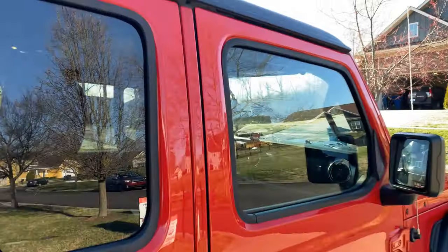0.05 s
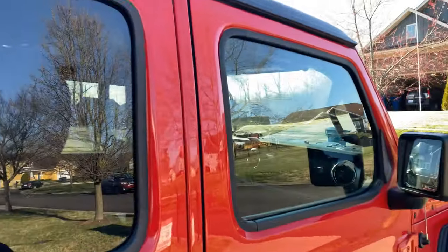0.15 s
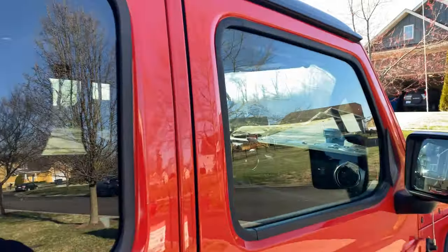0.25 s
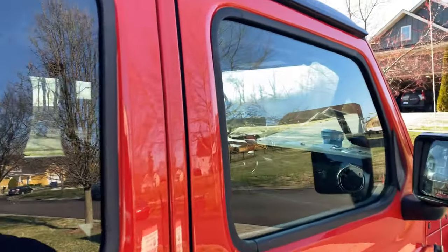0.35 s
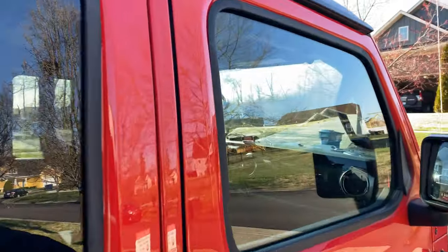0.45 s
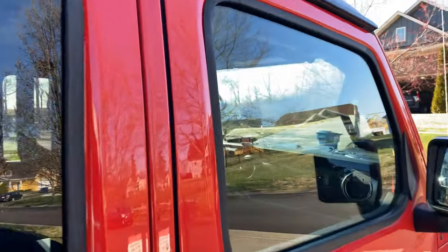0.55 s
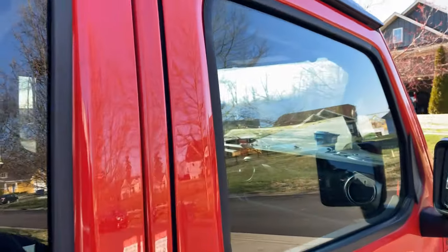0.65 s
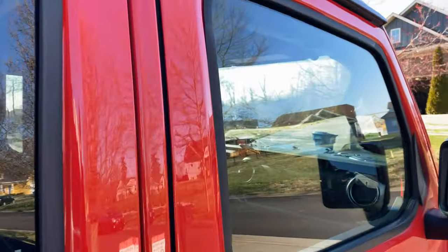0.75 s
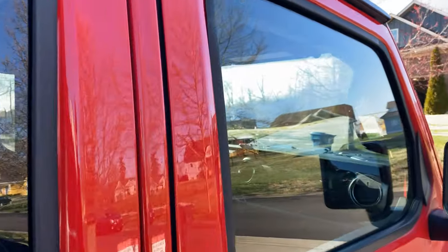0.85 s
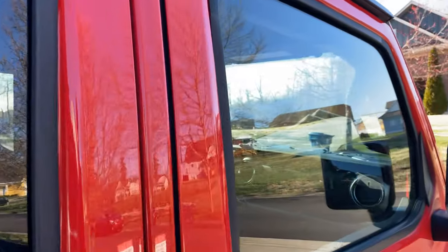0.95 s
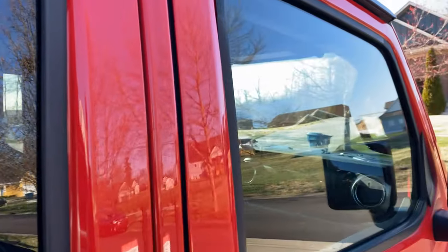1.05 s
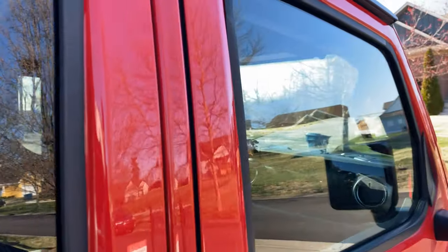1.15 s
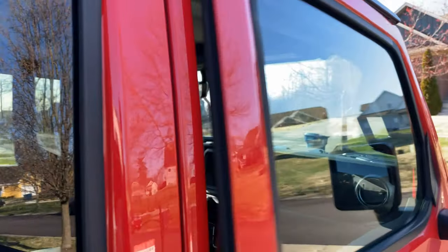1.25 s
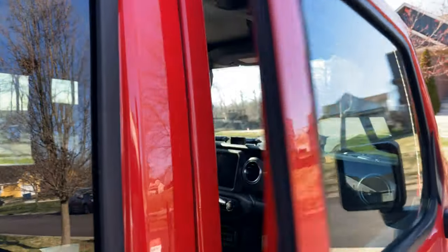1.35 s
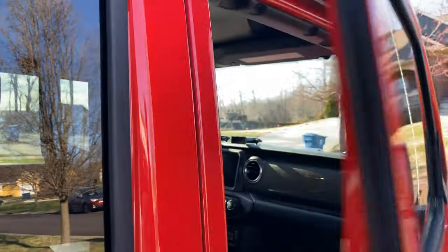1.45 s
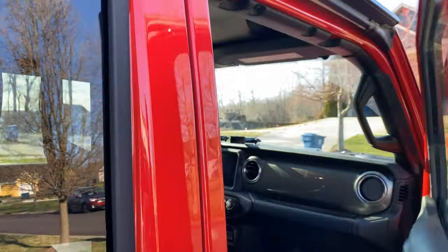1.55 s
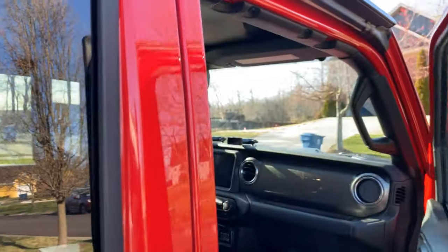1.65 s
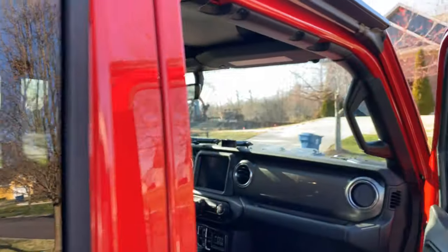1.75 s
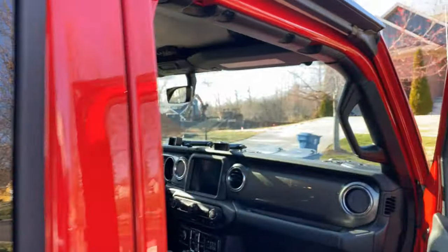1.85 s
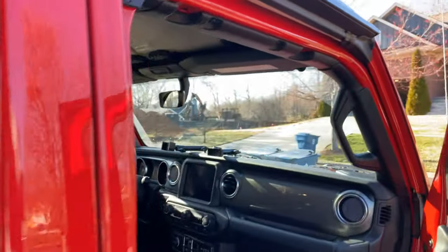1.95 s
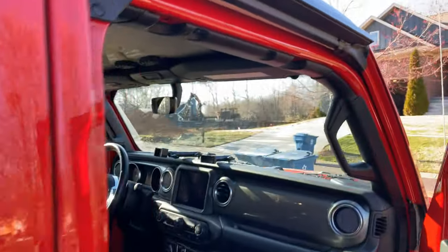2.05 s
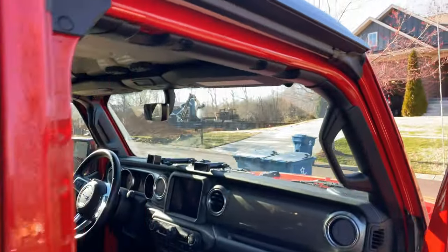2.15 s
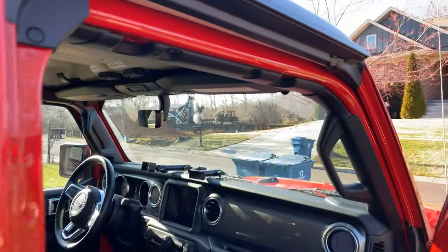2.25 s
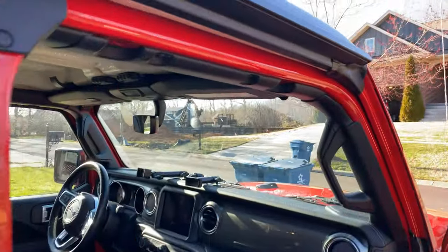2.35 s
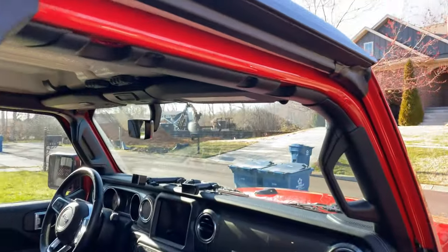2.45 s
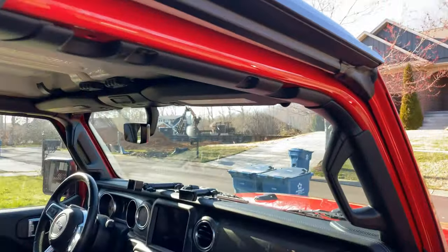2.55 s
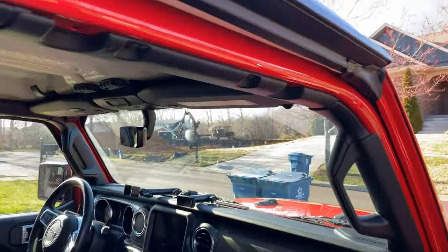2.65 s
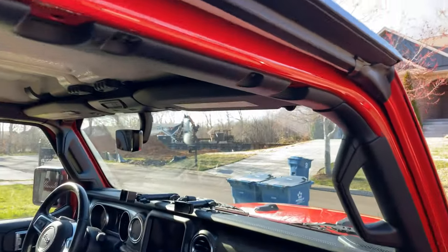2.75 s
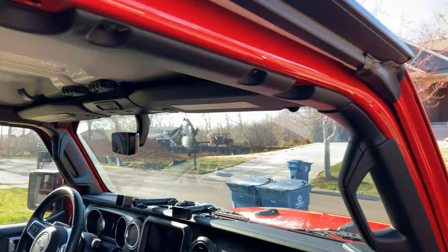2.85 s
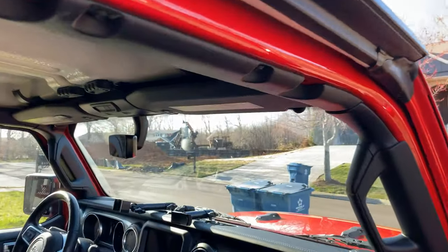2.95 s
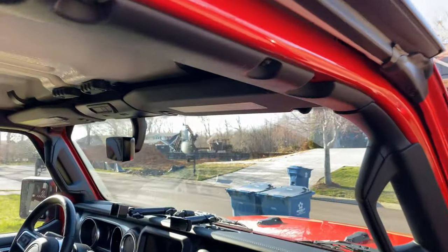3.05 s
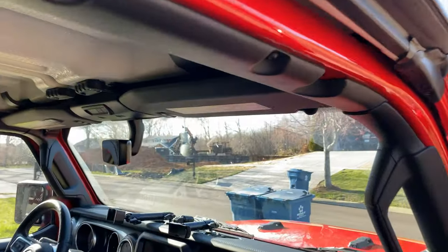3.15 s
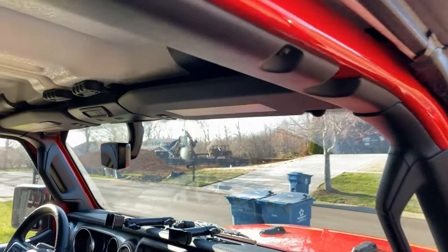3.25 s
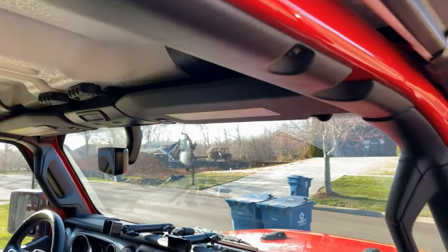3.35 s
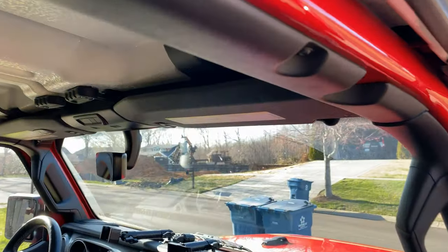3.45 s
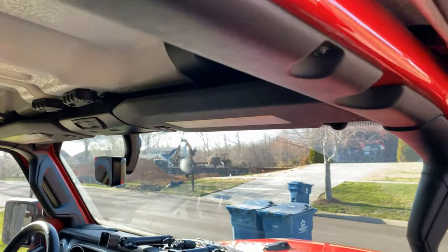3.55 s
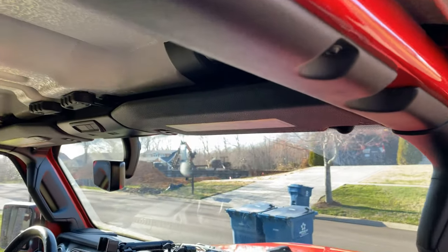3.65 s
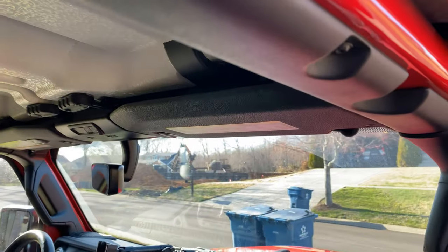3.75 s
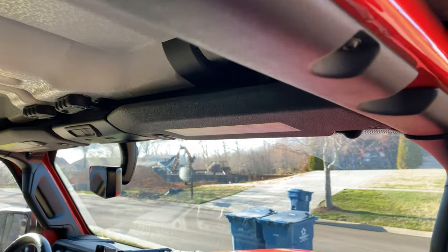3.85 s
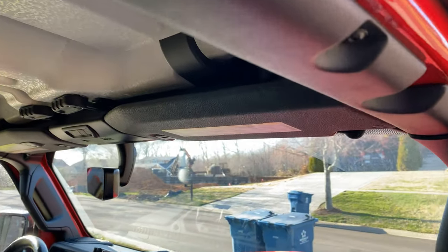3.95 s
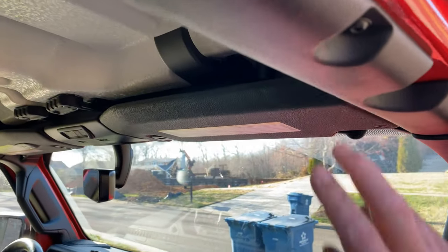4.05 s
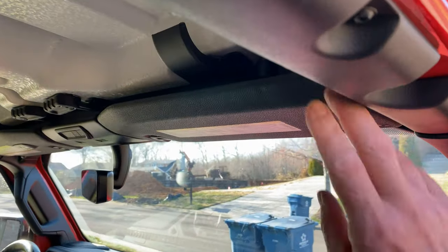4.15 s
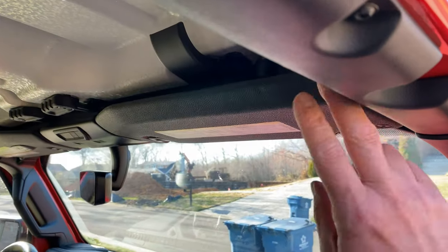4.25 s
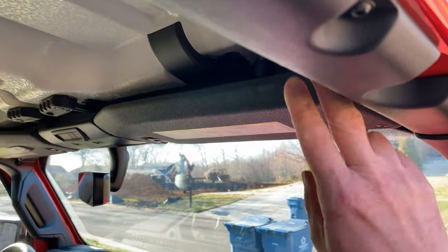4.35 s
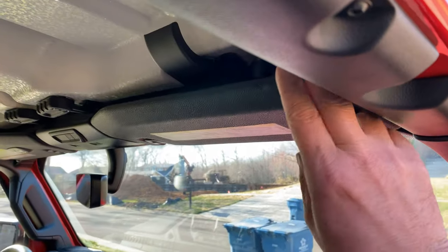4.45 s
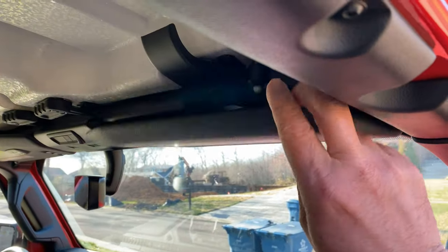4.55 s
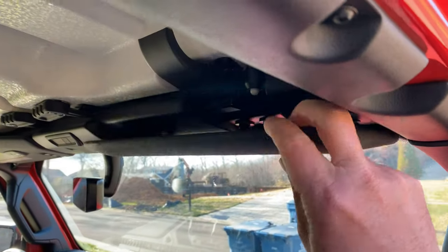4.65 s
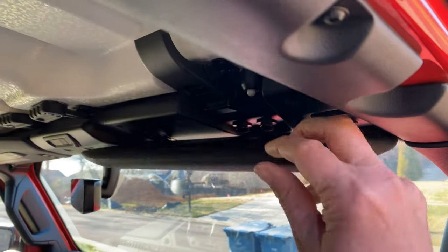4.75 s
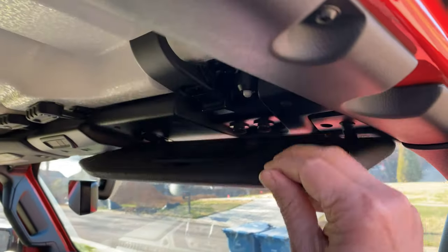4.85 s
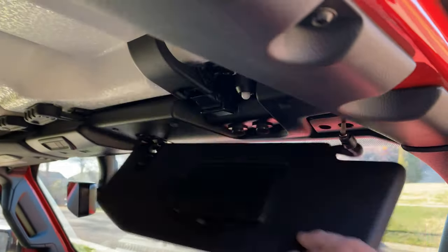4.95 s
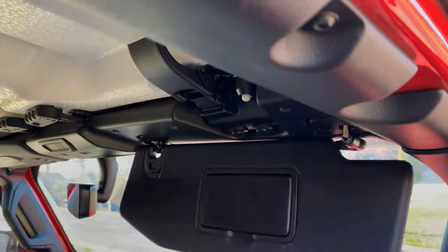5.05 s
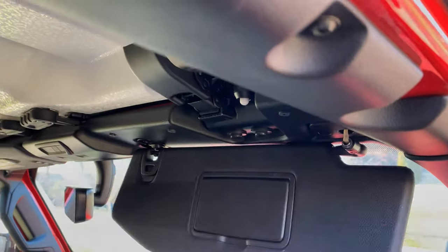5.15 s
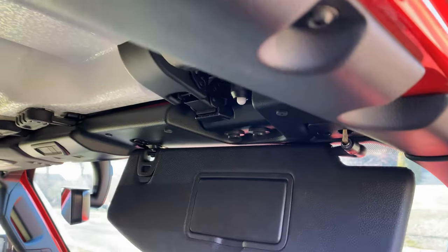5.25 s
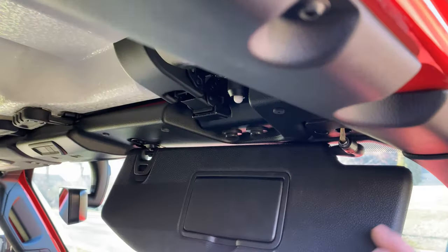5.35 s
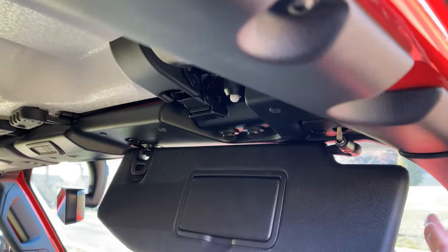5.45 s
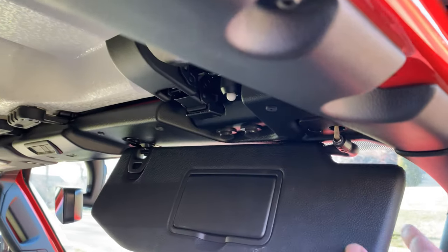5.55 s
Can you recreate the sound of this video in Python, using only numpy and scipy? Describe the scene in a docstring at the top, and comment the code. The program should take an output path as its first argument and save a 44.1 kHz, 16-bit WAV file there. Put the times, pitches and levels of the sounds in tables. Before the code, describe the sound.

Small birds chirp on a quiet street as a car door unlatches and swings to its stop, followed by a hard plastic visor snap.

```python
"""Small birds whistle in the trees, near and far, over a quiet street and the rumble of a hand-held microphone.
A car door is opened: the handle ticks, the latch lets go, the door booms, its check strap clunks and it meets
a rubber stop. Soft steps fall, clothes rustle, then a hand snaps the sun visor out of its seat, close by.
Birds are gliding sine notes with echoes; door and visor are struck sets of fading tones and noise;
booms and footsteps are low fading tones; cloth, rumble and street are coloured noise."""
import sys
import numpy as np
from scipy import signal
from scipy.fft import rfft, irfft, next_fast_len
from scipy.io import wavfile
from scipy.ndimage import uniform_filter1d, map_coordinates

SR = 44100
rng = np.random.default_rng(int(sys.argv[2]) if len(sys.argv) > 2 else 0)


def dump_mix(stems):
    """Bounce the given channels to the path in sys.argv[1] as a 16-bit WAV at rate SR."""
    frames = np.atleast_2d(stems).T  # one column per channel
    limited = np.clip(frames, -1, 1)  # hard clip at full scale
    pcm = np.round(limited * 32767).astype(np.int16)
    wavfile.write(sys.argv[1], SR, pcm)


N = 246959  # length in samples
TOP_HZ = 16500  # upper limit of the sound

# colour of the low rumble, used for handling and under booms and footsteps: pitch_hz, relative level_db per Hz
RUMBLE = [(20, -12.5), (40, 4), (60, 8.5), (90, 3), (150, -4.5), (265, -13.5), (600, -47), (1300, -73.5)]

# ways of touching: ring factor of the clicks (1 = full ring), treble edge in Hz, swell in s
# an edge above half the sample rate takes away almost no treble
TICK = (0.39, 42000, .0001)
CLUNK = (1, 5700, .0001)
SCRAPE = (1.6, 17000, 0.0011)
TAP = (0.81, 30000, .0001)
SNAP = (0.66, 10700, 0.00074)
CLICK = (0.3, 28000, .0001)
THUD = (0.92, 690, 0.00026)
STOP = (0.29, 1300, .0001)

# unsteadiness of near and far calls, and of the fast tremble in both, as shares of the pitch
FLUTTER, FAR_FLUTTER, TREMBLE = .009, .028, .007
FLUTTERS_PER_S, TREMBLES_PER_S = 140, 500


def amp(db):
    """Decibels to gain."""
    return 10 ** (np.asarray(db) / 20)


def unit(x):
    """x scaled to an rms of 1."""
    return x / np.sqrt(np.mean(x ** 2) + 1e-20)


def along(points, hz):
    """Values of (Hz, value) points, read between them on a log pitch axis."""
    f, v = np.transpose(points)
    return np.interp(np.log(hz + 1), np.log(f + 1), v)


def curves(rows):
    """One value per sample for each column after the time."""
    s, *cols = np.transpose(rows)
    return [np.interp(np.arange(N) / SR, s, c) for c in cols]


def wobble(rate):
    """A smooth random curve through `rate` random points a second."""
    points = rng.standard_normal(int(N * rate / SR) + 4)
    return map_coordinates(points, [np.arange(N) * rate / SR])


def filtered(x, gain):
    """x times a gain that depends on frequency."""
    size = next_fast_len(x.shape[-1] + 2048)
    spectrum = rfft(x, size) * gain(np.fft.rfftfreq(size, 1 / SR))
    return irfft(spectrum, size)[..., :x.shape[-1]]


def add(track, s, sound):
    """Mix a sound into a track at time s, cut off at the end of the track."""
    part = track[..., round(s * SR):][..., :sound.shape[-1]]
    part += sound[..., :part.shape[-1]]


def stereo(pair, side_db, left_db):
    """Left and right from a middle and a side signal; left_db is the lead of the left ear."""
    mid, side = pair[0], amp(side_db) * pair[1]
    return np.array([(mid + side) * amp(left_db / 2), (mid - side) * amp(-left_db / 2)])


def placed(pair, side_db, left):
    """Stereo with a balance that depends on frequency."""
    return filtered(stereo(pair, side_db, 0), lambda hz: amp(np.outer([.5, -.5], along(left, hz))))


def noise(spectrum, size=N):
    """Two unrelated noises of the same colour, with a joint rms of 1."""
    white = rng.standard_normal((2, size))
    return unit(filtered(white, lambda hz: amp(along(spectrum, hz))))


def fading(x, decay, stretch):
    """Each frequency of x dies at its own speed; stretch multiplies all the decay times."""
    hz, t, z = signal.stft(x, SR, nperseg=256)
    z = z * amp(-60 * t / (stretch * along(decay, hz)[:, None]))
    return signal.istft(z, SR, nperseg=256)[1][:, :x.shape[-1]]


def echo(x, decay):
    """A diffuse tail, different at each ear, 5 ms after the direct sound: x smeared by fading noise."""
    tail = fading(rng.standard_normal((2, SR // 2)), decay, 0.4)
    tail = np.pad(tail / np.linalg.norm(tail[0]), ((0, 0), (SR // 200, 0)))
    return signal.fftconvolve(np.atleast_2d(x), tail, axes=1)[:, :N]


def background():
    """Lumpy handling rumble over the hush of the street and faint cloth rustle, all coloured noise."""
    # handling of the microphone and the moving door: time_s, level_db of the rumble between its lumps
    handling = [(0.0, -60.5), (0.51, -77), (0.97, -50.5), (1.15, -73), (1.26, -34), (1.46, -57.5),
                (1.65, -46), (1.9, -43), (2.01, -45), (2.26, -56.5), (3.17, -56), (3.49, -61), (4.8, -58),
                (5.05, -52), (5.36, -58.5), (5.6, -63.5)]
    # slow swells of the street hush and of faint cloth rustle: time_s, change of level_db
    hush_swells = [(0, 3.5), (.5, 1.5), (1.5, 4.5), (2.3, 1.5), (2.8, 2), (3.7, 2.5), (4.6, 6), (5.2, 2.5),
                   (5.6, 1.5)]
    # colour of the hush: pitch_hz, relative level_db per Hz
    hush_colour = [(25, -9.5), (85, -6.5), (400, -11.5), (620, -11.5), (1400, -24), (3400, -28),
                   (5500, -32), (8000, -39), (12000, -37), (16000, -48.5)]
    lump_db, lumps_per_s, hush_db = 3.5, 39, -66
    rumble_db, = curves(handling)
    swell_db, = curves(hush_swells)
    lumpy_db = rumble_db + lump_db * np.abs(wobble(lumps_per_s))
    rumble = amp(lumpy_db) * stereo(noise(RUMBLE), side_db=-14, left_db=0.2)
    hush = stereo(noise(hush_colour), side_db=-2.5, left_db=1.5)
    return rumble + amp(hush_db + swell_db) * hush


def birds():
    """Near calls bounce off a house and scatter among the trees; of far calls only the scatter arrives."""
    # rising whistles: start_s, length_s, start_hz, end_hz, level_db
    rises = [(0, 0.017, 3200, 3450, -61), (0.242, 0.037, 3070, 3480, -64.5), (0.291, .022, 3170, 3300, -69),
             (0.328, 0.022, 3240, 3570, -66.5), (0.877, 0.11, 5080, 5070, -78),
             (1.413, 0.066, 2680, 3410, -67), (1.489, 0.081, 3220, 3490, -67),
             (2.007, 0.024, 3110, 3240, -69), (3.428, 0.07, 3010, 3530, -60.5),
             (3.563, 0.048, 3750, 4140, -74), (3.599, 0.075, 4090, 4150, -63.5),
             (3.898, 0.044, 5300, 6200, -72), (4.568, 0.026, 2910, 3270, -65.5),
             (5.043, 0.026, 2600, 2940, -56.5), (5.081, 0.035, 3300, 3740, -63),
             (5.245, 0.11, 2710, 3503, -53), (5.472, 0.031, 3610, 4070, -73.5)]
    # falling whistles: start_s, length_s, start_hz, end_hz, level_db
    falls = [(0.378, 0.085, 3990, 3590, -62), (0.459, 0.066, 3860, 3620, -62),
             (0.627, 0.055, 2870, 2700, -63), (0.666, 0.18, 2754, 2710, -67),
             (0.991, 0.046, 2990, 2740, -62), (1.28, 0.028, 3020, 2560, -56.5),
             (1.682, 0.0333, 2960, 2300, -66.5), (1.854, 0.048, 3380, 2470, -63.5),
             (3.407, 0.035, 3300, 3040, -64), (3.771, 0.054, 3680, 3000, -57),
             (3.998, 0.039, 3120, 2620, -62), (4.6, 0.019, 4170, 3950, -64),
             (4.806, 0.027, 3170, 2670, -54), (5.111, .042, 3150, 2470, -58.5)]
    # short diving chirps: start_s, length_s, start_hz, end_hz, level_db
    dives = [(0.113, 0.023, 4780, 3350, -70), (.16, 0.013, 4460, 3800, -70),
             (0.199, 0.01, 4300, 3100, -67.5), (1.669, 0.022, 3400, 2930, -62),
             (1.823, 0.04, 3900, 3180, -66), (2.075, 0.016, 3320, 2580, -59.5),
             (3.746, 0.0188, 4180, 3040, -60.5), (4.622, 0.025, 3470, 2470, -58.5),
             (4.764, 0.014, 4380, 3050, -57.5), (4.795, .016, 3500, 3150, -60)]
    # trembling calls from far off: start_s, length_s, start_hz, end_hz, level_db before the scatter
    far_calls = [(0.098, 0.02, 4650, 4550, -70), (.13, 0.022, 4400, 3900, -80),
                 (0.917, 0.13, 4180, 3750, -69.5), (0.952, .04, 3650, 3200, -72),
                 (1.286, 0.037, 3000, 3730, -64.5), (1.456, 0.089, 3010, 3390, -72),
                 (1.631, .05, 3600, 3400, -64.5), (1.637, 0.021, 2650, 2700, -59.5),
                 (1.818, 0.096, 4050, 3550, -66.5), (1.874, 0.08, 3100, 2600, -71),
                 (2.138, .13, 3430, 3500, -66), (4.229, 0.14, 3850, 4130, -59),
                 (4.482, 0.031, 4780, 5190, -58), (4.565, 0.042, 3700, 4080, -61),
                 (4.64, 0.026, 3320, 2700, -65), (4.762, 0.017, 4100, 3580, -59),
                 (5.087, 0.025, 3670, 3030, -66), (5.29, .07, 3140, 3480, -74)]
    # the echo of the trees fades as the microphone moves into the cab: time_s, level_db
    tree_echo = [(2.2, 0), (3.4, -3.5), (5.2, -4)]
    near, far, house = np.zeros((3, N))
    # the bend: rises flatten at the top, falls flatten on landing, dives steepen to the end
    for track, calls, bend, flutter in [(near, rises, 1.4, FLUTTER), (near, falls, 2.2, FLUTTER),
                                        (near, dives, .6, FLUTTER), (far, far_calls, 1, FAR_FLUTTER)]:
        for s, length, start_hz, end_hz, db in calls:
            add(track, s, amp(db) * whistle(length, start_hz, end_hz, bend, flutter))
    near = (near + long_whistle()) * amp(1.2 * wobble(80))  # the level flickers
    add(house, .024, amp(-16.5) * near)  # one reflection, 24 ms late
    echo_db, = curves(tree_echo)
    # the tail's decay is given as (Hz, s); echo() shortens it
    scatter = echo(near + far, [(2000, 0.94), (6000, 0.46)])
    return near + house + amp(echo_db) * scatter


def whistle(length, start_hz, end_hz, bend, flutter):
    """A fluttering note that glides from one pitch to another."""
    left = np.linspace(1, 0, round(length * SR))  # share of the glide still to go
    pitch = end_hz + (start_hz - end_hz) * left ** bend
    return unit(signal.windows.tukey(len(left), .3) * warble(pitch, flutter))


def warble(pitch, flutter):
    """A sine on a pitch track, with a slow flutter and a fast tremble."""
    def waver(rate):
        """A smooth random curve as long as the note."""
        return map_coordinates(rng.standard_normal(256), [np.arange(len(pitch)) * rate / SR], mode="mirror")

    hz = pitch * (1 + flutter * waver(FLUTTERS_PER_S) + TREMBLE * waver(TREMBLES_PER_S))
    return np.sin(2 * np.pi * np.cumsum(hz) / SR)


def long_whistle():
    """One held note that climbs in steps to a high plateau while its loudness rises and dips."""
    # the path of the note: time_s, pitch_hz, peak level_db
    note_path = [(4.035, 2950, -65), (4.075, 3150, -67), (4.124, 3280, -49), (4.204, 3420, -56.5),
                 (4.239, 3780, -48.5), (4.299, 3900, -60.5), (4.35, 3920, -51.5), (4.385, 3890, -65)]
    s, hz, db = np.transpose(note_path)
    track, t = np.zeros(N), np.arange(s[0], s[-1], 1 / SR)
    note = warble(np.interp(t, s, hz), FLUTTER) * signal.windows.tukey(len(t), .05)
    add(track, s[0], amp(np.interp(t, s, db)) * note)
    return track


def strikes(groups, modes, colour, decay, modes_db, crack_db, click_from_hz):
    """Each contact rings a body with a low knock, a middle clack and a high click.

    The way of touching sets attack, brightness and ring."""
    track, t = np.zeros((2, N)), np.arange(SR // 3) / SR
    hz, mode_db, t60 = np.transpose(modes)[:, :, None]
    start = rng.uniform(0, 2 * np.pi, hz.shape)
    # each mode reaches one ear a little early
    phase = np.array([start, start + rng.choice([-1, 1], hz.shape) * np.pi / 2])
    band_edges = [(130, 700), (700, click_from_hz), (click_from_hz, TOP_HZ)]
    bands = [signal.butter(3, edges, "band", fs=SR, output="sos") for edges in band_edges]
    crack = 1 + amp(crack_db) * np.exp(-t / .006)  # the contact itself stands out for some 6 ms
    for contacts, (ring, edge_hz, swell) in groups:
        onset = 1 - np.exp(-t / swell)  # sliding contacts build up, hard ones start almost at once
        # soft contacts lack the top treble
        softness = signal.butter(2, min(edge_hz, SR / 2 - 1), fs=SR, output="sos")
        stretches = [1, min(ring, 1) ** .5, ring]  # the ring factor acts most on the click
        for s, knock_db, clack_db, click_db in contacts:
            strength = amp(mode_db + rng.normal(0, 1, phase.shape))
            strength = strength / np.linalg.norm(strength[0])
            # contacts in quick succession feed the same swing of each mode
            waves = strength * np.sin(2 * np.pi * hz * (t + s) + phase)
            dense = noise(colour, size=len(t))
            for band, db, stretch in zip(bands, [knock_db, clack_db, click_db], stretches):
                tones = np.sum(waves * amp(-60 * t / (t60 * stretch)), axis=1)
                body = crack * fading(dense, decay, stretch) + amp(modes_db) * tones
                part = signal.sosfilt(np.vstack([band, softness]), onset * body)
                # the first 20 ms set the level
                attack_rms = np.sqrt(np.mean(part[:, :SR // 50] ** 2, axis=1, keepdims=True))
                add(track, s, amp(db) * part / attack_rms)
    return track


def door():
    """Handle, latch and check strap rattle the door: struck modes plus the latch plate's own rings."""
    # single tones of the door: pitch_hz, relative level_db, base t60_s (time to fall by 60 dB)
    tones = [(210.8, 2.5, 0.13), (383, 9.5, 0.11), (497.4, 3, 0.12), (620, -5.5, 0.18), (760, -15, 0.12),
             (827, 6.5, 0.09), (1219, 1.5, 0.086), (1506, -6.5, 0.078), (1520, -23, 0.16),
             (2243, -58, 0.064), (2714, -28, 0.11), (3380, 9, 0.028), (4190, -6, 0.065), (4700, -39, 0.1)]
    # its dense tones, too close to tell apart: pitch_hz, relative level_db per Hz
    colour = [(120, 10.5), (550, -5), (850, -1.5), (1240, -2), (1800, -15), (2700, -18), (3600, -21.5),
              (5000, -24.5), (7400, -27.5), (11000, -33), (16000, -34)]
    # how fast the dense tones die: pitch_hz, base t60_s
    decay = [(200, 0.27), (800, 0.11), (3000, 0.17), (12000, 0.11)]
    # small hard parts of handle, latch and hinge: start_s, knock_db, clack_db, click_db
    ticks = [(.7726, -48, -56, -55.5), (.779, -46, -64, -58), (.8, -46.5, -53.5, -59.5),
             (1.129, -60, -55, -51), (1.141, -44, -59, -47), (1.2535, -52, -52, -53),
             (1.6215, -69, -53.5, -63), (1.635, -46, -56, -55.5), (1.784, -55, -41.5, -40)]
    # the latch lets go and the check strap takes up: start_s, knock_db, clack_db, click_db
    clunks = [(1.0635, -50.5, -49, -59), (1.097, -43, -43.5, -52), (1.167, -40.5, -47, -61),
              (1.195, -35, -29.5, -37), (1.2005, -28, -31, -56), (1.5305, -71, -52, -60.5),
              (1.773, -44, -45, -47.5), (1.7825, -41, -41, -49)]
    # the padded door rebounds on its seal and strap: start_s, knock_db, clack_db, click_db
    thuds = [(1.212, -33, -58, -58), (1.2245, -55, -44, -60), (1.2545, -51, -39, -47),
             (1.2615, -39, -34, -50), (1.277, -58, -49, -64), (1.757, -50.5, -59, -65),
             (1.8, -37, -50, -67)]
    # handle, seal and hinge slide: start_s, knock_db, clack_db, click_db
    scrapes = [(.593, -56, -67, -55.5), (.603, -59.5, -71, -50), (.921, -57, -64, -68),
               (1.175, -44, -44, -50), (1.557, -62, -54, -60.5), (1.91, -51.5, -64, -70),
               (1.938, -52.5, -62.5, -69), (1.97, -63, -56.5, -60.5), (2.121, -80, -68, -62)]
    # how much louder the door is at the left ear: pitch_hz, level_db
    left = [(60, -5.5), (180, 0.5), (550, -0.5), (1650, -0.5), (4970, 5), (15000, -3)]
    groups = [(ticks, TICK), (clunks, CLUNK), (thuds, THUD), (scrapes, SCRAPE), (rattle(count=7), TICK)]
    pair = strikes(groups, tones, colour, decay, modes_db=-2.5, crack_db=5.5, click_from_hz=1920)
    return placed([pair[0] + latch_ring(), pair[1]], side_db=-6.0, left=left)


def latch_ring():
    """The steel latch plate swells into a short ring when the pawl strikes it."""
    # rings of the plate: start_s, peak level_db, pitch_hz, t60_s
    rings = [(1.195, -28, 1199, 0.022), (1.195, -24.5, 3570, 0.017), (1.2605, -23, 856, 0.035)]
    swell_cycles = 1.7
    track, t = np.zeros(N), np.arange(SR // 4) / SR
    for s, db, hz, t60 in rings:
        shape = (1 - np.exp(-t * hz / swell_cycles)) * amp(-60 * t / t60)
        add(track, s, amp(db) * shape / shape.max() * np.sin(2 * np.pi * hz * t))
    return track


def rattle(count):
    """Loose parts chatter while the latch drags off its striker: faint contacts at random moments."""
    from_s, to_s, spread_db = 1.2, 1.255, 3.5
    s = rng.uniform(from_s, to_s, count)
    size_db = spread_db * rng.standard_normal((count, 1))
    return np.column_stack([s, size_db + (-62, -72, -64.5)])  # average knock, clack and click in dB


def booms():
    """Door, car body and soft footsteps boom: fading low tones, the lower the slower to start, over rumble."""
    # low booms of door and car body, and soft footsteps: start_s, peak level_db, pitch_hz, t60_s
    boom_rows = [(0.598, -40, 134, 0.12), (.8, -47, 114.6, 0.93), (.92, -38, 75.4, 0.1),
                 (1.097, -37.5, 124.7, 1), (1.197, -17, 72.7, 0.14), (1.205, -27, 131.6, 0.37),
                 (1.207, -32, 222, 0.19), (1.636, -36, 127, 0.32), (1.793, -39, 108.5, 0.6),
                 (1.802, -44, 175, 0.047), (1.916, -44.5, 271, 0.16), (1.995, -32.5, 70, 0.33),
                 (2.123, -41.5, 145.6, 0.23), (2.181, -40, 67.4, 0.13), (2.232, -46, 84, .2),
                 (2.517, -40, 85.5, 0.13), (2.647, -40, 89.5, 0.13), (4.142, -48.5, 203, 0.23),
                 (4.259, -43.5, 79.6, 0.23), (4.882, -29.5, 95, 0.23), (4.881, -25, 250.2, .07),
                 (4.939, -29.5, 65.7, 0.4), (5.051, -30, 68.2, 0.15)]
    swell_cycles, shudder_db = 0.27, -11  # the shudder is rumble, set against each boom
    track, swing, t = np.zeros(N), np.zeros(N), np.arange(SR // 2) / SR
    for s, db, hz, t60 in boom_rows:
        shape = (1 - np.exp(-t * hz / swell_cycles)) ** 2 * amp(-60 * t / t60)
        shape = amp(db) * shape / shape.max()
        add(track, s, shape * np.sin(2 * np.pi * hz * t))
        add(swing, s, shape)
    shudder = amp(shudder_db) * swing * noise(RUMBLE)
    return stereo([track + shudder[0], shudder[1]], side_db=-6.0, left_db=2.0)


def stop_thump():
    """The door ends its swing: one soft push whose pitch sinks as the rubber stop gives."""
    middle_s, half_s, peak_db = 2.074, .008, -21
    from_hz, to_hz = 202, 53.7
    t = np.arange(N) / SR - middle_s
    hz = to_hz + (from_hz - to_hz) * (1 - np.tanh(t / half_s + 0.86)) / 2
    swell = amp(peak_db) * np.exp(-(t / half_s) ** 2 / 2)
    push = swell * np.sin(2 * np.pi * np.cumsum(hz) / SR)
    return np.array([push, push])


def clothes():
    """Cloth rubs and swishes in short strokes, scratchy as the fibres catch; each rasps at its own pitch."""
    # strokes of moving clothes: middle_s, half_length_s, rasp_hz, relative rub_db, relative swish_db
    strokes = [(2.45, 0.054, 1920, -55.5, -76), (2.621, 0.034, 2210, -56, -79),
               (2.724, 0.0089, 1200, -62.5, -92.5), (2.938, 0.02, 1600, -55.5, -84),
               (2.993, 0.025, 5260, -57.5, -64), (3.096, 0.018, 3000, -61.5, -82),
               (3.218, 0.046, 3040, -51.5, -69), (3.332, 0.079, 2730, -54, -70.5),
               (3.916, 0.19, 2080, -63.5, -74), (4.181, 0.025, 1310, -50, -72.5),
               (4.35, 0.082, 3620, -55.5, -72.5), (4.798, 0.067, 2480, -63, -64.5),
               (5.057, 0.024, 900, -50, -64.5), (5.35, 0.037, 2030, -52.5, -60),
               (5.55, 0.048, 1840, -55, -64.5)]
    # colour of the rub: pitch_hz, relative level_db per Hz
    rub_colour = [(120, -15), (300, 12.5), (650, 1.5), (1100, 4), (1700, -1), (2500, -3), (4000, -5),
                  (8000, -10), (14000, -48.5)]
    # colour of the swish: pitch_hz, relative level_db per Hz
    swish_colour = [(2500, -9), (6000, -9), (11000, 21), (15500, 10.5)]
    grip_db, catch_db = 1.9, 0.5  # scatter of the grip and of single fibres
    rasp_db, rasp_octaves = 6, 0.27  # height and width of the rasp
    track, t = np.zeros((2, N)), np.arange(N) / SR
    catching = unit(amp(grip_db * wobble(60) + catch_db * wobble(900)))
    rub = catching * stereo(patchy(noise(rub_colour), depth_db=1.8), side_db=-4.5, left_db=1.0)
    swish = catching * stereo(noise(swish_colour), side_db=1.5, left_db=-0.5)
    for middle, half, rasp_hz, rub_db, swish_db in strokes:
        span = np.abs(t - middle) < 4 * half
        speed = np.exp(-((t[span] - middle) / half) ** 2 / 2)
        octaves_off = lambda hz: np.log2((hz + 1) / rasp_hz)
        rasp = lambda hz: amp(rasp_db * np.exp(-(octaves_off(hz) / rasp_octaves) ** 2 / 2))
        rasping = amp(rub_db) * unit(filtered(rub[:, span], rasp))
        add(track, t[span][0], speed * (rasping + amp(swish_db) * swish[:, span]))
    return amp(-4.5) * track


def patchy(x, depth_db):
    """x with short patches of random gain, so that its colour keeps changing."""
    z = signal.stft(x, nperseg=256)[2]
    field = uniform_filter1d(rng.standard_normal(z.shape[1:]), 4, 0)  # smooth over pitch
    field = uniform_filter1d(field, 7, 1)  # smooth over time
    return unit(signal.istft(z * amp(depth_db * unit(field)), nperseg=256)[1][:, :N])


def visor():
    """Fingers tap the visor, it snaps loose and then knocks against its stop, a little off centre."""
    # single tones of the visor and its roof bracket: pitch_hz, relative level_db, base t60_s
    tones = [(310, -5.5, .11), (473, 1.5, .08), (604, -3, .08), (797, 1, .09), (892, 3, .09),
             (1020, -4, .07), (1347, -2, .06), (1526, -3, .07), (2003, 1, .05), (2239, -6, .06),
             (2374, -4, .06), (2586, -3, .06), (2663, 5, .057), (3182, -6, .06), (3525, -9, .06),
             (4094, -5, .05), (4360, -4, .05), (4628, -8, .06), (4870, -8, .06), (5198, -4, .05),
             (6385, -9, .05), (6640, -12, .05), (7160, -10, .045)]
    # its dense tones, too close to tell apart: pitch_hz, relative level_db per Hz
    colour = [(180, -11.5), (300, 0), (600, -3.5), (900, 3.5), (1850, -3), (2900, -14), (4000, -14),
              (7400, -26), (11000, -22.5), (16000, -17.5)]
    # how fast the dense tones die: pitch_hz, base t60_s
    decay = [(300, 0.16), (1000, 0.09), (4000, 0.12), (12000, 0.07)]
    # fingers and the stop hit the hard rim: start_s, knock_db, clack_db, click_db
    taps = [(4.1418, -46, -38.5, -51.5), (4.879, -25, -22.5, -34), (4.996, -47, -42, -47),
            (5.008, -42.5, -36.5, -53.5)]
    # the padded panel knocks dully as it is pulled and stopped: start_s, knock_db, clack_db, click_db
    knocks = [(4.1425, -57, -41, -56), (4.147, -46.5, -48.5, -54), (4.8795, -20.5, -15.5, -39),
              (4.996, -40, -38, -58), (5.0085, -34.5, -36, -64)]
    # the visor springs out of its seat: start_s, knock_db, clack_db, click_db
    snaps = [(4.8885, -34.5, -23.5, -22), (4.892, -38, -22, -22)]
    # the detent in its pivot: start_s, knock_db, clack_db, click_db
    clicks = [(4.967, -67.5, -61, -56), (4.983, -64.5, -49, -41), (4.991, -50.5, -55, -45.5),
              (5.124, -63.5, -65.5, -65.5), (5.236, -60, -66.5, -72)]
    # how much louder the visor is at the left ear: pitch_hz, level_db
    left = [(60, 6.0), (150, 5.9), (380, 1.5), (950, 1.2), (2380, 1.8), (5980, 22), (15000, 0.5)]
    lag_s = 2.2e-5  # the nearer microphone port, on the left, hears the visor first
    groups = [(taps, TAP), (knocks, STOP), (snaps, SNAP), (clicks, CLICK)]
    pair = strikes(groups, tones, colour, decay, modes_db=-0.5, crack_db=-3, click_from_hz=2200)
    lag = lambda hz: np.exp(np.outer([1j, -1j], np.pi * hz * lag_s))
    return filtered(placed(pair, side_db=-7.0, left=left), lag)


def scene():
    """All sources together; the open cab gives every contact a short, dead tail."""
    # how fast the cab's tail dies: pitch_hz, t60_s before echo() shortens it
    cab_decay = [(200, 0.099), (1500, 0.019), (10000, 0.043)]
    contacts = door() + visor()
    cab = amp(-15.5) * echo(contacts, cab_decay)
    return background() + birds() + contacts + cab + booms() + stop_thump() + clothes()


def record(dry):
    """The recorder thins the deepest bass, rounds off the highest peaks and keeps nothing above TOP_HZ."""
    thinned = signal.sosfilt(signal.butter(2, 35, "high", fs=SR, output="sos"), dry)
    rounded = thinned / (1 + np.abs(thinned) ** 6) ** (1 / 6)
    return filtered(rounded, lambda hz: hz < TOP_HZ)


dry = scene()
out = record(dry)
dump_mix(out)
```